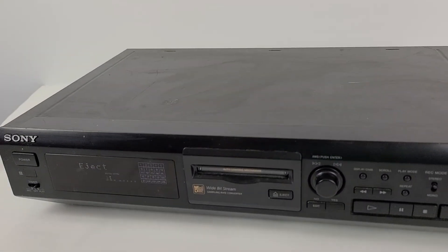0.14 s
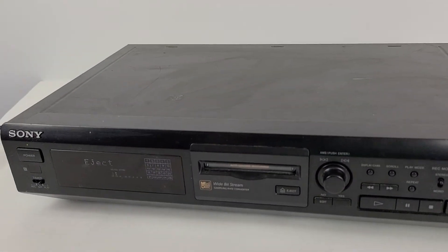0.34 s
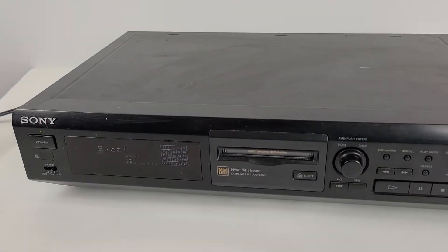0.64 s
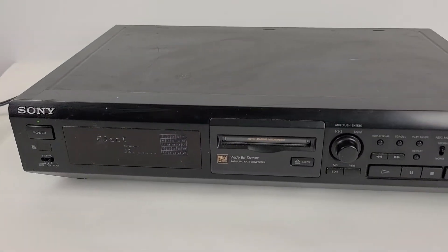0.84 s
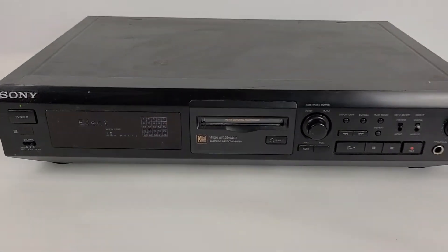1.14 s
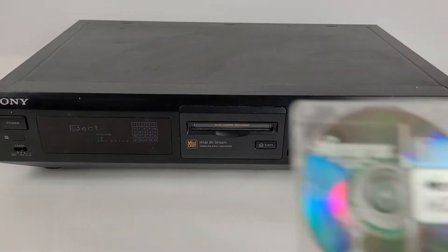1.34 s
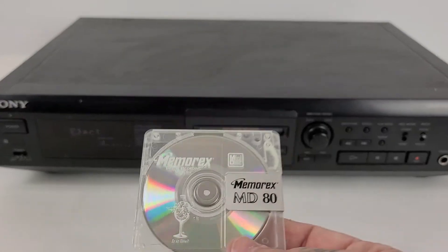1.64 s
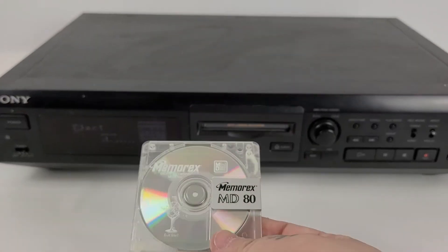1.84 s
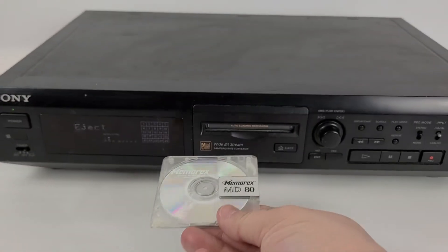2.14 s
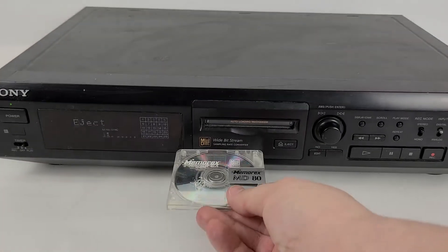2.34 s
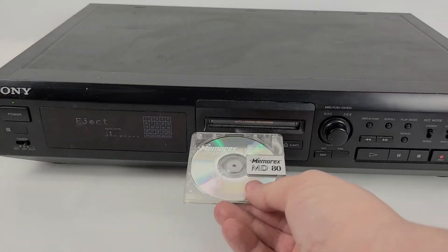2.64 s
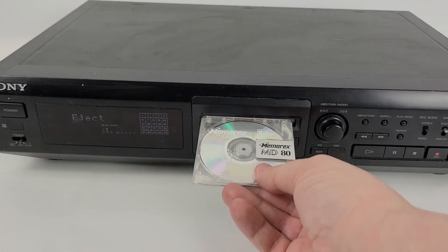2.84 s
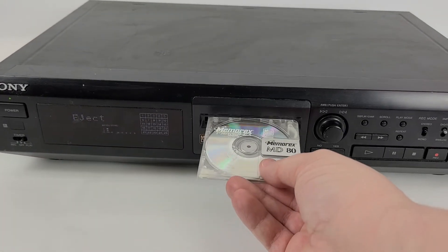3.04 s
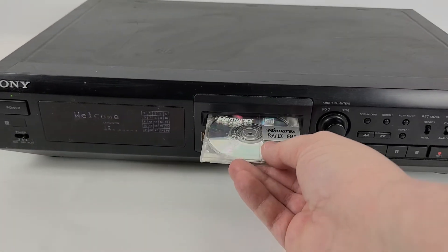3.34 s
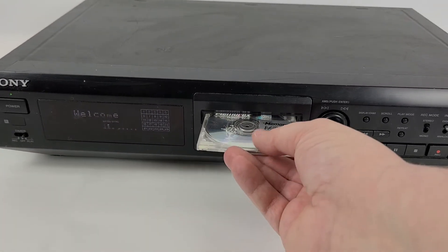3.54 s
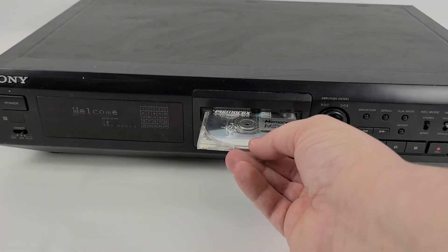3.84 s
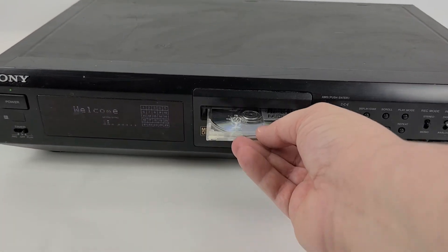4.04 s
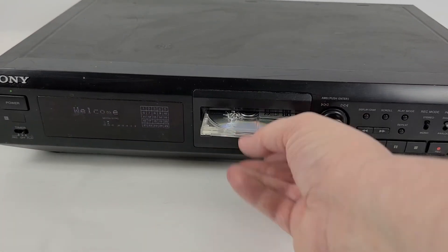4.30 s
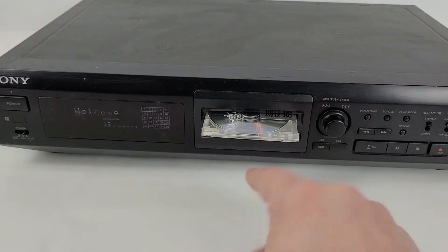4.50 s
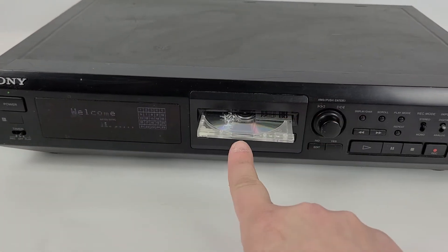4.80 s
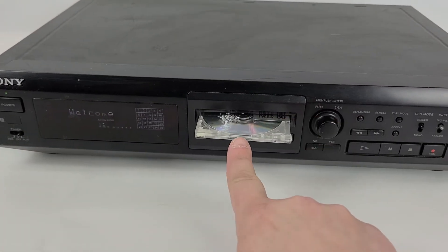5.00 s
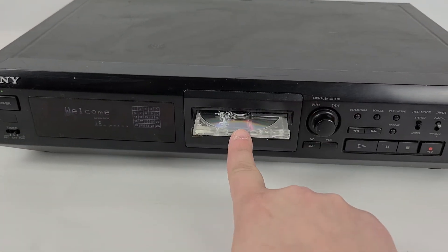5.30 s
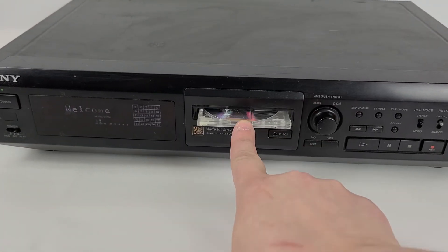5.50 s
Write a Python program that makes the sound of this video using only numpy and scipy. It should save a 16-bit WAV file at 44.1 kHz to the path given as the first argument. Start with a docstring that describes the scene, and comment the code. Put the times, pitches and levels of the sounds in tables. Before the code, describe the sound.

Close stereo in a quiet, nearly dry room: a disc deck's idling motor whirs softly, ticking about nineteen times a second, while a plastic cartridge clicks and rubs in the hand. A loud triple-contact clack rings through the case, then dull bumps and small squeaks follow at the slot. Finally a loaded gear skips in a loud, bright, limping rattle over a motor hum, lasting to the end.

```python
"""A slipping loading gear in a disc deck, close by in a quiet room: noise bursts for contacts, damped modes for ringing.
While a plastic disc cartridge clicks and rubs in the hand, the motor whirs and the idling gear ticks once a turn.
Three quick contacts make one loud clack, then the cartridge bumps, squeaks and stutters into the slot.
The motor runs harder: a wheel with thirteen uneven teeth skips in a fast, limping rattle that rings
through the sheet-metal case, above a hum at multiples of the tooth rate."""
import sys
import numpy as np
from scipy import signal
from scipy.fft import rfft, irfft, next_fast_len
from scipy.io import wavfile

SR = 44100
rng = np.random.default_rng(int(sys.argv[2]) if len(sys.argv) > 2 else 0)


def persist_wave(psi):
    """Save psi, clipped to +-1, as 16-bit WAV."""
    counts = np.round(np.clip(psi, -1, 1) * 32767).astype(np.int16)
    wavfile.write(sys.argv[1], SR, np.atleast_2d(counts).T)


N = 249606
TIME = np.arange(N) / SR
BAND_HZ = 25 * 2 ** (np.arange(39) / 4)  # quarter-octave centres

# Rotation of the idling gear. Each row: time in seconds, turns completed.
IDLE_TURNS = [(.0415, 0), (.5715, 10), (1.5825, 29), (2.2225, 41), (2.7025, 50)]
# Travel of the slipping wheel, fast at first, then slowed by the load to 30 teeth a second.
# Each row: time in seconds, teeth passed.
WHEEL_TRAVEL = [(3.4222, 0), (3.6792, 10), (3.7665, 13), (3.8948, 17), (3.9959, 20), (4.5943, 38),
                (5.6515, 70)]
# Modes of the sheet-metal case. Each row: frequency in Hz, relative level in dB, 60 dB decay time in seconds.
CASE_MODES = [(249.6, -13, 0.063), (259, -11, 0.17), (301.2, -10.5, 0.24), (353.7, -6, .13),
              (508.4, -15, 0.16), (670.5, -13, 0.35), (763.9, 3.5, 0.093), (791, -5.5, 0.057),
              (1924, -11, 0.045), (2048, -9.5, 0.034)]
# Spectra of the skipping teeth, the bumps and the whir. Each row: frequency in Hz, relative density in dB per Hz.
SKIP_COLOUR = [(200, 1), (500, -11), (800, -2.5), (1150, -3), (2000, 3), (3200, 0.5), (5300, 0),
               (6700, 1.5), (9100, -5), (11000, 1), (16000, 1)]
BUMP_COLOUR = [(150, -1.5), (300, 11.5), (700, 12.5), (1200, 0), (2600, -1.5), (4500, -11), (16000, -27.5)]
WHIR_COLOUR = [(30, -49), (70, -2.5), (120, -11.5), (165, -18), (240, 1), (340, 2), (420, -9.5), (520, 2),
               (600, -15.5), (760, 0.5), (1100, -25), (1900, -13), (8000, -54)]
# Narrow resonances of the plastic parts on a skip. Each row: frequency in Hz, width in Hz, boost in dB.
SKIP_PEAKS = [(11880, 470, 0.94)]


def from_db(db):
    """Amplitude gain is the exponential of level: 20 dB for each factor of ten."""
    return 10 ** (np.asarray(db) / 20)


def at_hz(points, hz):
    """Interpolate a table along logarithmic frequency, so that equal intervals count alike."""
    known_hz, values = np.transpose(points)
    return np.interp(np.log(hz), np.log(known_hz), values)


def clicks(times, heights):
    """Impulse excitation: a train of single-sample pushes."""
    samples = np.clip(np.round(times * SR).astype(int), 0, N - 1)
    return np.bincount(samples, heights, N)


def held(t, start, end, attack_db_per_s, release_db_per_s):
    """Exponential envelope: a gain that swells up to 1 at the start, holds, and dies after the end."""
    before_db = attack_db_per_s * np.maximum(start - t, 0)
    after_db = release_db_per_s * np.maximum(t - end, 0)
    return from_db(-np.minimum(before_db + after_db, 120))


def strokes(t, rows):
    """Sliding friction in strokes: each swells and dies exponentially, and the strongest one prevails."""
    attack_db_per_s, release_db_per_s = 295, 235
    gains = [from_db(db) * held(t, start, end, attack_db_per_s, release_db_per_s) for start, end, db in rows]
    return np.max(gains, axis=0)


def noise_bands(ripple_db=4.0, ripple_hz=70):
    """Partial coherence: rms-1 stereo noise bands, most alike in the low mids and unrelated in the treble."""
    # Correlation of the channels. Each row: frequency in Hz, left-right likeness from 0 to 1.
    likeness = [(150, 0.6), (700, 0.8), (1250, 0), (4400, 0.08)]
    # Stereo balance. Each row: frequency in Hz, left over right in dB.
    balance = [(300, 0.8), (700, 0.2), (1500, 3.5), (5000, 0), (10000, 1.5)]
    size = next_fast_len(N)
    mid, side = rfft(rng.standard_normal((2, size)))
    bin_hz = np.maximum(np.arange(len(mid)) * SR / size, 1)
    # the crowded high modes of the case leave steady ripples in the spectrum, other ones at each microphone
    ripple_points = rng.standard_normal((2, SR // 10))
    ripples = np.array([np.interp(bin_hz / ripple_hz, np.arange(len(r)), r) for r in ripple_points])
    crowd = from_db(ripple_db * ripples * (bin_hz > 1200))
    octaves = np.log2(bin_hz)
    bands = []
    for hz in BAND_HZ:
        inside = np.abs(octaves - np.log2(hz)) < 1 / 8
        alike = np.clip(at_hz(likeness, hz), -1, 1)
        common = np.sqrt(1 + alike) * mid[inside]
        opposed = np.sqrt(1 - alike) * side[inside] * [[1], [-1]]
        part = np.zeros((2, len(mid)), np.complex64)
        part[:, inside] = crowd[:, inside] * (common + opposed)
        band = irfft(part, size)[:, :N]
        channel_gains = from_db(at_hz(balance, hz) * np.array([[.5], [-.5]]))
        bands.append(band * np.float32(channel_gains / band.std()))
    return np.array(bands)


def band_gains(colour):
    """Band power is density times bandwidth: the share of each band in a sound of power 1."""
    gains = from_db(at_hz(colour, BAND_HZ)) * np.sqrt(BAND_HZ)
    return np.float32(gains / np.linalg.norm(gains))


def hiss(bands, colour):
    """Powers of unrelated bands add: steady noise of a given colour, rms about 1."""
    return np.tensordot(band_gains(colour), bands, 1)


def snaps(bands, times, db, colour, damping, rise_cycles):
    """Statistical energy: contacts feed countless close modes, whose energy builds in cycles and dies by band."""
    # Dying of the dense high modes. Each row: frequency in Hz, 60 dB decay time in seconds at damping 1.
    decay = [(250, 0.17), (1000, 0.13), (14000, 0.081)]
    energy = clicks(times, from_db(db) ** 2) + 1e-18
    out = np.zeros((2, N), np.float32)
    for band, hz, gain in zip(bands, BAND_HZ, band_gains(colour)):
        if hz > 90:
            fall = from_db(-120 * damping / (at_hz(decay, hz) * SR))  # 120, as this is energy
            rise = np.exp(-hz / (rise_cycles * SR))
            stored = signal.lfilter([1 - rise], [1, -fall - rise, fall * rise], energy)
            out += gain * band * np.sqrt(np.abs(np.float32(stored)))
    return out


def ring(modes, times, db, rise_s, tilt_db=0, scatter_s=0, uneven_db=0):
    """Modal superposition: blows ring damped modes, uneven in strength and timing; tilt is dB per octave."""
    out = np.zeros(N)
    rise = np.exp(-1 / (rise_s * SR))
    chance = rng.standard_normal((len(times), len(modes), 2))
    for k, (hz, mode_db, t60) in enumerate(modes):
        tilted_db = db + mode_db + tilt_db * np.log2(hz / 791)  # the tilt pivots on a mode of the case
        strength = from_db(tilted_db + uneven_db * chance[:, k, 0])
        force = clicks(times + scatter_s * np.abs(chance[:, k, 1]), strength) + 1e-18
        r = from_db(-60 / (t60 * SR))
        w = 2 * np.pi * hz / SR
        # a faster-dying copy is taken away: the panel takes a moment to swing up
        for sign, pole in ((0.97, r), (-1.0, r * rise)):
            poles = [1, -2 * pole * np.cos(w), pole * pole]
            out += sign * signal.lfilter([0, pole * np.sin(w)], poles, force)
    return out


def resonate(x, peaks):
    """Resonant amplification: two-pole filters ring on top of a sound, longer the narrower they are."""
    out = x
    for hz, width, db in peaks:
        r = np.exp(-np.pi * width / SR)
        poles = [1, -2 * r * np.cos(2 * np.pi * hz / SR), r * r]
        out = out + from_db(db) * (1 - r * r) / 2 * signal.lfilter([1, 0, -1], poles, x)
    return out


def cracks(times, db, low_hz, spread_s, count=5):
    """Impulsive contact: its first crisp instant is a few bare, high-passed clicks in quick succession."""
    delay, height = rng.random((len(times), 2, count)).transpose(1, 0, 2)
    click_s = times[:, None] + spread_s * delay
    heights = from_db(db)[:, None] * (2 * height - 1)
    train = clicks(click_s.ravel(), heights.ravel())
    high_pass = signal.butter(2, low_hz, "high", fs=SR, output="sos")
    return signal.sosfilt(high_pass, train + 1e-18)


def idle_tick_times():
    """Periodic excitation: one tick for each turn of the unloaded gear."""
    s, turns = np.transpose(IDLE_TURNS)
    return np.interp(np.arange(turns[-1] + 1), turns, s)


def skips():
    """Cyclic irregularity: each passing tooth gives one skip, with its own time, snap, ring and tilt."""
    # The thirteen uneven teeth, which come round again and again. Each row: lateness in seconds,
    # relative snap in dB, relative case ring in dB, relative ring tilt in dB per octave.
    teeth = [(0, -0.9, 4, -3), (.0004, 2.5, 1.5, 6), (-.0018, -2, 3.5, -4.5), (-.0009, 0.5, 4.5, 4),
             (.0005, 0, 2.5, -0.8), (.0004, -0.9, -5, 6), (-0.0034, 0.5, 5, 2), (.0004, -2, 1, 4),
             (.0007, 0.5, 2, 1), (-.0007, -0.5, 2, -3.5), (0, 0.2, 5, 1), (0, -0.3, 3, -1.5),
             (.0005, 1.6, 2, -3)]
    s, passed = np.transpose(WHEEL_TRAVEL)
    number = np.arange(int(passed[-1]) + 1)
    late_s, snap_db, ring_db, tilt_db = np.array(teeth)[number % len(teeth)].T
    return np.interp(number, passed, s) + late_s, snap_db, ring_db, tilt_db


def effort(t):
    """Impact strength grows with load and speed: load level and extra loudness of faster teeth, in dB."""
    # How hard the teeth bite as the cartridge is pushed in and let go.
    # Each row: time in seconds, level in dB from full load.
    bite = [(3.42, -7), (3.65, -8.5), (3.71, -4.5), (3.82, -4.5), (3.89, -11), (3.99, -1), (4.2, -2.5),
            (4.35, -1), (5.26, -1), (5.36, -10), (5.45, -7), (5.54, -23), (5.66, -15.5)]
    speed_db_per_octave = 4.5
    s, passed = np.transpose(WHEEL_TRAVEL)
    rates = np.diff(passed) / np.diff(s)
    rate = rates[np.searchsorted(s[1:-1], t)]
    return np.interp(t, *np.transpose(bite)), speed_db_per_octave * np.log2(rate / rates[-1])


def mains_hum():
    """Steady periodic forcing: the deck's transformer hums faintly all the time in pure tones."""
    # Tones of the transformer. Each row: frequency in Hz, rms level in dB.
    tones = [(60, -75), (120, -70.5)]
    return sum(from_db(db) * np.sqrt(2) * np.sin(2 * np.pi * hz * TIME) for hz, db in tones)


def drone():
    """Fourier series: the unloaded gear train sounds alike on every turn, as multiples of its rate, rms 1."""
    s, turns = np.transpose(IDLE_TURNS)
    rate = turns[-1] / (s[-1] - s[0])
    turned = rate * TIME + np.interp(TIME, s, turns - rate * s)
    hz = rate * np.arange(1, 56)
    phases = np.exp(2j * np.pi * rng.random(len(hz)))
    turn = irfft(np.r_[0, from_db(at_hz(WHIR_COLOUR, hz)) * phases], 4096)
    return np.interp(turned, np.arange(len(turn)) / len(turn), turn / turn.std(), period=1)


def hum():
    """Harmonics of tooth passing: low multiples of the tooth rate follow the wheel's travel, rms about 1."""
    # Harmonics of the loaded drive. Each row: multiple of the tooth rate, relative level in dB.
    harmonics = [(2, -12.5), (3, -5.5), (4, -2)]
    passed = np.interp(TIME, *np.transpose(WHEEL_TRAVEL))
    turning = (TIME > WHEEL_TRAVEL[0][0]) & (TIME < WHEEL_TRAVEL[-1][0])
    tones = sum(from_db(db) * np.sqrt(2) * np.sin(2 * np.pi * multiple * passed) for multiple, db in harmonics)
    return turning * tones


def motor(bands):
    """Forced vibration: load raises whir and gear hiss, each tick or skip rocks the mounts, strain hums."""
    # Slow swings of the drive on its mounts.
    # Each row: frequency in Hz, relative level in dB, 60 dB decay time in seconds.
    mount_modes = [(62, -11, .14), (86, -11, .12), (120, 0, .16)]
    # Low hum and throb under strain. Each row: time in seconds, relative level in dB.
    strain_curve = [(3.48, -6), (3.7, -12), (4.12, -11), (4.18, 0), (5.45, -0.5), (5.54, -17)]
    idle_whir_db, idle_throb_db, idle_hiss_db, drone_db = -56.5, -67.5, -68, -54.5
    whir_db, throb_db, hum_db = -44, -51, -48
    grind_db, grind_follows = -47.5, 0.39  # level at full load, share of the load's swing
    idle_fade_db_per_s, run_down_db_per_s, spin_up_db_per_s = 12, 150, 330

    ticks, skip_times = idle_tick_times(), skips()[0]
    load_db, speed_db = effort(TIME)
    # the drive takes up its load just before the first skip
    idle = held(TIME, 0, ticks[-1], 0, run_down_db_per_s)
    loaded = held(TIME, skip_times[0], TIME[-1], spin_up_db_per_s, 0)
    strain = loaded * from_db(np.interp(TIME, *np.transpose(strain_curve)))

    whir = np.hypot(from_db(idle_whir_db), loaded * from_db(whir_db))
    idle_hiss = idle * from_db(idle_hiss_db - idle_fade_db_per_s * TIME)
    grind = loaded * from_db(grind_db + grind_follows * load_db + speed_db)
    throb = idle * from_db(idle_throb_db) + strain * from_db(throb_db)
    pushes = np.r_[ticks, skip_times]
    rocking = ring(mount_modes, pushes, 0, rise_s=0.014, scatter_s=0.00011, uneven_db=1.5)
    teeth = resonate(hiss(bands, SKIP_COLOUR), SKIP_PEAKS)
    tones = idle * from_db(drone_db) * drone() + strain * from_db(hum_db) * hum()
    noise = whir * hiss(bands, WHIR_COLOUR) + (idle_hiss + grind) * teeth
    return noise + throb * rocking / rocking.std() + tones


def idling_gear(bands):
    """Periodic impacts: light ticks over a sizzle of teeth, so even that the frame hums at their multiples."""
    # Spectrum of a tick. Each row: frequency in Hz, relative density in dB per Hz.
    tick_colour = [(300, 5), (900, 14.5), (1150, -3), (2000, -14), (3200, -10.5), (7300, 2), (9300, -17),
                   (11500, -7.5), (16000, -4)]
    # Narrow resonances of the plastic parts. Each row: frequency in Hz, width in Hz, boost in dB.
    tick_peaks = [(3890, 190, 12), (5860, 260, 10), (8600, 69, 11), (11350, 200, 15.5)]
    # Modes of the gearbox frame. Each row: frequency in Hz, relative level in dB, 60 dB decay time in seconds.
    gearbox_modes = [(263.6, -7.5, 0.21), (306.7, -2, 0.31), (429, -11, 0.45), (520, 0.5, 0.072),
                     (732.7, 0, 0.16), (768.7, 8.5, 0.11), (1394, -3, 0.075), (1906, 3.5, 0.061)]
    times = idle_tick_times()
    uneven = .8 * rng.standard_normal(len(times))  # dB
    tick = snaps(bands, times, uneven - 57.5, tick_colour, damping=2.0, rise_cycles=1.5)
    sizzle = from_db(-69.0) * hiss(bands, tick_colour) * (TIME < times[-1])
    frame = ring(gearbox_modes, times, uneven / 2 - 51.0, rise_s=0.0059, scatter_s=0.00022, uneven_db=1.44)
    return resonate(tick + sizzle, tick_peaks) + frame


def handling(bands, slips_per_s=350):
    """Stick-slip friction: the light shell clicks, rings and slides in tiny random slips, with one soft thud."""
    # Clicks of the cartridge shell.
    # Each row: time in seconds, relative snap level in dB, relative shell ring level in dB.
    hand_clicks = [(.2306, -49, -41), (.7097, -33.5, -32.5), (.821, -33.5, -48), (.837, -32, -41),
                   (.854, -35, -53), (1.2213, -46.5, -56), (1.315, -48.5, -50), (1.361, -49.5, -44.5)]
    # Rubbing on table, fingers and flap. Each row: start in seconds, end in seconds, relative level in dB.
    rubs = [(0.702, 0.74, -42.5), (0.813, 0.873, -37.5), (1.1, 1.158, -47), (1.21, 1.345, -57.5),
            (2.087, 2.29, -58), (3.042, 3.27, -65)]
    # Spectrum of the shell's contacts. Each row: frequency in Hz, relative density in dB per Hz.
    cartridge_colour = [(1200, -19), (2100, 5), (3000, -0.5), (4600, 1.5), (7500, -9.5), (12500, -5.5),
                        (16000, -8)]
    # Modes of the shell. Each row: frequency in Hz, relative level in dB, 60 dB decay time in seconds.
    shell_modes = [(1610, -8, 0.037), (2116, 3.5, 0.054), (2287, -3.5, 0.05), (2520, -5, .04),
                   (3040, -5, 0.045), (4900, -9, 0.03)]
    click_s, click_db, ring_db = np.transpose(hand_clicks)
    slips = TIME[rng.random(N) < slips_per_s / SR]
    uneven_db = 3.5 * rng.standard_normal(len(slips))
    slip_db = 20 * np.log10(strokes(slips, rubs)) - 9.5 + uneven_db
    times = np.r_[click_s, slips]
    contact_db = np.r_[click_db, slip_db]
    shell = snaps(bands, times, contact_db, cartridge_colour, damping=1.37, rise_cycles=3.5)
    shell_ring_db = np.r_[ring_db, slip_db - 8]
    rings = ring(shell_modes, times, shell_ring_db, rise_s=0.00093, scatter_s=0.00079, uneven_db=5)
    thud = ring([(108, 1, 0.12)], np.array([1.225]), -32.0, rise_s=0.02)
    crackle = cracks(times, contact_db + 9.5, low_hz=1800, spread_s=.004)
    return shell + crackle + rings + thud


def squeaks(width=0.042, edge_db_per_s=900):
    """Friction-driven resonance: random rubbing sets one narrow band singing roughly for a moment."""
    # Squeaks of the sliding cartridge, and a 564 Hz tone that lingers after the bump at 3.244 s. Each row:
    # start in seconds, end in seconds, frequency in Hz, level in dB.
    songs = [(0.715, 0.717, 4800, -40), (0.71, 0.722, 2230, -40), (0.822, 0.85, 2170, -43.5),
             (1.09, 1.137, 4730, -54.5), (2.875, 2.922, 2080, -57.5), (3.173, 3.203, 2050, -54),
             (3.258, 3.285, 564, -43), (3.36, 3.41, 1970, -53)]
    out = 0
    friction = rng.standard_normal((2, N))
    for start, end, hz, db in songs:
        band = signal.butter(1, [hz * (1 - width), hz * (1 + width)], "band", fs=SR, output="sos")
        song = signal.sosfilt(np.r_[band, band], friction)
        gain = from_db(db) * held(TIME, start, end, edge_db_per_s, edge_db_per_s)
        out = out + gain * song / song.std()
    return out


def clack(bands):
    """Impact excitation: three quick contacts shake the whole deck, and the lid's lightly damped modes ring on."""
    # Contacts of the clack.
    # Each row: time in seconds, relative snap level in dB, relative case ring level in dB.
    contacts = [(2.2908, -26, -19), (2.2985, -21.5, -22.5), (2.306, -18.5, -18)]
    # Spectrum of a contact. Each row: frequency in Hz, relative density in dB per Hz.
    clack_colour = [(150, -27), (280, 17), (700, 16.5), (1100, 1.5), (1900, 7), (3000, 0.5), (6500, -0.5),
                    (9500, -8.5), (12000, -3.5)]
    # Slowest dying modes of the lid.
    # Each row: frequency in Hz, relative level in dB, 60 dB decay time in seconds.
    lid_modes = [(302, 4, .3), (432, -4, .6), (584, -2, .95)]
    times, snap_db, ring_db = np.transpose(contacts)
    snap = snaps(bands, times, snap_db - 1.0, clack_colour, damping=0.78, rise_cycles=0.42)
    bright_snap = resonate(snap, [(11480, 180, 12)])
    case = ring(CASE_MODES, times, ring_db - 6.5, rise_s=0.0055, tilt_db=-4.5)
    lid = ring(lid_modes, times[-1:], -38.0, rise_s=0.0023)
    return bright_snap + case + lid


def slot_bumps(bands):
    """Soft impacts excite mainly low modes: the cartridge knocks dully against the slot's flap and guides."""
    # Bumps in the slot. Each row: time in seconds, relative snap level in dB, relative case ring level in dB.
    bumps = [(2.7175, -41.5, -41), (2.8482, -41, -30.5), (2.985, -36, -36.5), (3.0869, -46.5, -38),
             (3.244, -46, -38)]
    times, snap_db, ring_db = np.transpose(bumps)
    snap = snaps(bands, times, snap_db + 0.5, BUMP_COLOUR, damping=0.71, rise_cycles=5.3)
    return snap + ring(CASE_MODES, times, ring_db - 3.0, rise_s=0.0088, tilt_db=-6.0)


def skipping_gear(bands, uneven_db=0.73):
    """Repeated impacts: each tooth that jumps under load snaps, pings the pawl and knocks the case."""
    # Modes of the pawl that rides over the teeth.
    # Each row: frequency in Hz, relative level in dB, 60 dB decay time in seconds.
    pawl_modes = [(1397, -6, 0.055), (1548, -8.5, 0.066), (1915, 1, 0.049), (2045, 0, 0.059),
                  (2190, -8, .05), (2440, -5, 0.053), (2910, -1, 0.054), (3900, -3, .035)]
    # Teeth that catch unusually hard. Each row: time in seconds, extra pawl level in dB.
    catches = [(3.503, 7), (3.932, 10), (4.398, 6), (5.158, 7)]
    # base level in dB at full load, and share of the load's swing
    base_snap_db, snap_follows = -30.5, 0.4
    base_ring_db, ring_follows = -29, 1.33
    # the pawl rings mainly on the sharpest snaps: base level in dB, dB for each dB of snap
    base_pawl_db, pawl_follows = -39.5, 1.9

    times, tooth_snap_db, tooth_ring_db, tooth_tilt_db = skips()
    load_db, speed_db = effort(times)
    chance_db = uneven_db * rng.standard_normal(len(times))
    sharpness_db = snap_follows * load_db + tooth_snap_db + chance_db
    snap_db = base_snap_db + sharpness_db + speed_db
    ring_db = base_ring_db + ring_follows * load_db + tooth_ring_db
    catch_db = sum(db * (np.abs(times - s) < .012) for s, db in catches)
    pawl_db = base_pawl_db + catch_db + pawl_follows * sharpness_db

    snap = snaps(bands, times, snap_db, SKIP_COLOUR, damping=1.19, rise_cycles=3.9)
    bright_snap = resonate(snap, SKIP_PEAKS)
    knock = ring(CASE_MODES, times, ring_db, tilt_db=2.5 + tooth_tilt_db, scatter_s=0.00022,
                 uneven_db=0.92, rise_s=0.0019)
    pawl = ring(pawl_modes, times, pawl_db, rise_s=0.0022, scatter_s=0.001003, uneven_db=2.0)
    crack = cracks(times, snap_db + 6, low_hz=2500, spread_s=.005)
    sides = from_db(0.69 * np.array([[-.5], [.5]]))  # the knock is a little louder on the right
    return bright_snap + crack + pawl + knock * sides


def slot_drag(bands, slips_per_s=130):
    """Stick-slip along the guides: the cartridge stutters in deep modes, scrapes and jolts the loader."""
    # Stutters, then scraping shoves. Each row: start in seconds, end in seconds, relative level in dB.
    drags = [(3.45, 3.6, -38.5), (3.613, 3.692, -34), (3.95, 4.02, -38), (5.26, 5.39, -35.5),
             (5.487, 5.616, -39.5)]
    shoves = [(3.718, 3.809, -39), (4.01, 4.12, -40.5)]
    # Jolts against the moving loader. Each row: time in seconds, relative case ring level in dB.
    jolts = [(3.708, -29), (4.0951, -33), (5.4557, -26)]
    # Modes of the loader's carriage.
    # Each row: frequency in Hz, relative level in dB, 60 dB decay time in seconds.
    carriage_modes = [(233.4, -1, 0.072)]
    slips = TIME[rng.random(N) < slips_per_s / SR]
    deep_modes = carriage_modes + [mode for mode in CASE_MODES if mode[0] < 330]
    stutter = ring(deep_modes, slips, 20 * np.log10(strokes(slips, drags)), rise_s=0.0018)
    scrape = strokes(TIME, shoves) * hiss(bands, BUMP_COLOUR)
    jolt_s, jolt_db = np.transpose(jolts)
    return stutter + scrape + ring(CASE_MODES, jolt_s, jolt_db, rise_s=.0022, tilt_db=1.5)


def room(x, wall_hz, apart_hz):
    """Diffuse reverberation: a short decaying tail dulled by the walls; both microphones hear long waves alike."""
    t60_s = 0.099
    t = TIME[:SR // 2]
    mid, side = rng.standard_normal((2, len(t))) * from_db(-60 * t / t60_s) * (t > .006)
    side = signal.sosfilt(signal.butter(2, apart_hz, "high", fs=SR, output="sos"), side)
    tail = np.array([mid + side, mid - side]) / np.hypot(np.linalg.norm(mid), np.linalg.norm(side))
    dull = np.exp(-2 * np.pi * wall_hz / SR)
    dulled_tail = signal.lfilter([1 - dull], [1, -dull], tail)
    return signal.fftconvolve(x, dulled_tail, axes=1)[:, :N]


def scene():
    """Linear superposition: deck and cartridge, their echo in the room, and the room's own hush."""
    # Spectrum of the quiet room. Each row: frequency in Hz, relative density in dB per Hz.
    room_colour = [(25, 40), (110, 3), (600, -15), (1200, -39), (4000, -18), (16000, -55)]
    bands, other_bands = noise_bands(), noise_bands()
    deck = idling_gear(bands) + skipping_gear(bands) + motor(other_bands) + clack(other_bands) + mains_hum()
    # noise run backwards is unrelated to the same noise run forwards
    drag = slot_drag(bands[:, ::-1, ::-1])
    left, right = deck + slot_bumps(bands) + drag + handling(other_bands) + squeaks()
    # the sound reaches the left microphone six samples later
    direct = np.array([np.r_[np.zeros(6), left[:-6]], right])
    hush = from_db(-72) * hiss(bands[..., ::-1], room_colour)
    mic_hiss = from_db(-73.5) * rng.standard_normal((2, N))
    return direct + from_db(-7.0) * room(direct, wall_hz=3900, apart_hz=790) + hush + mic_hiss


def record(dry):
    """Band limitation: the microphones drop the deepest bass, and the top is cut steeply."""
    thin = signal.sosfilt(signal.butter(2, 42, "high", fs=SR, output="sos"), dry)
    return signal.sosfilt(signal.ellip(12, .1, 80, 15650, fs=SR, output="sos"), thin)


dry = scene()
out = record(dry)
persist_wave(out)
```